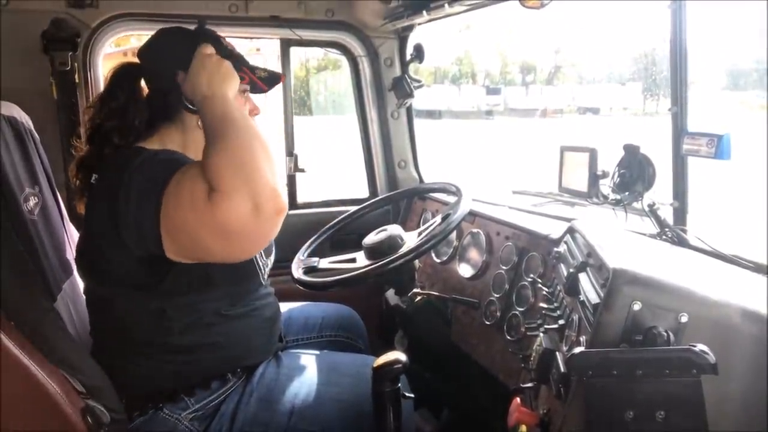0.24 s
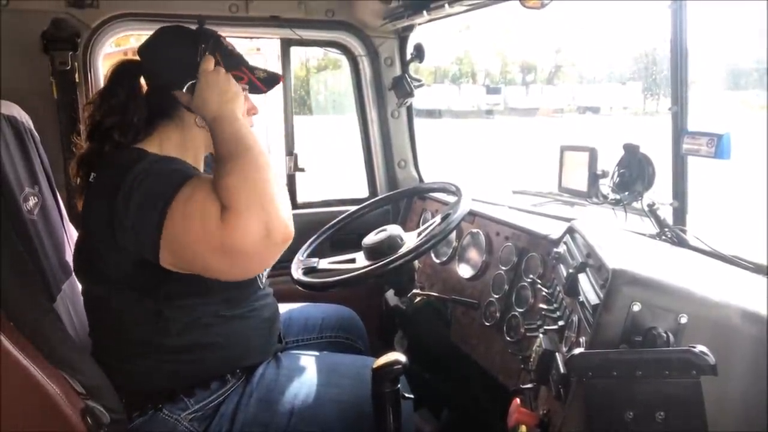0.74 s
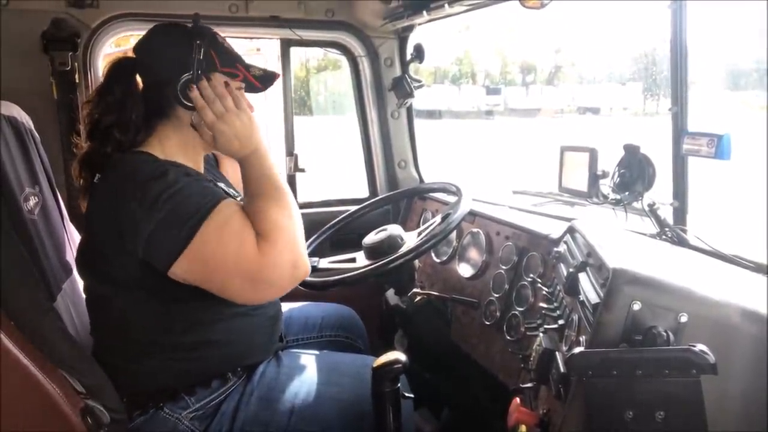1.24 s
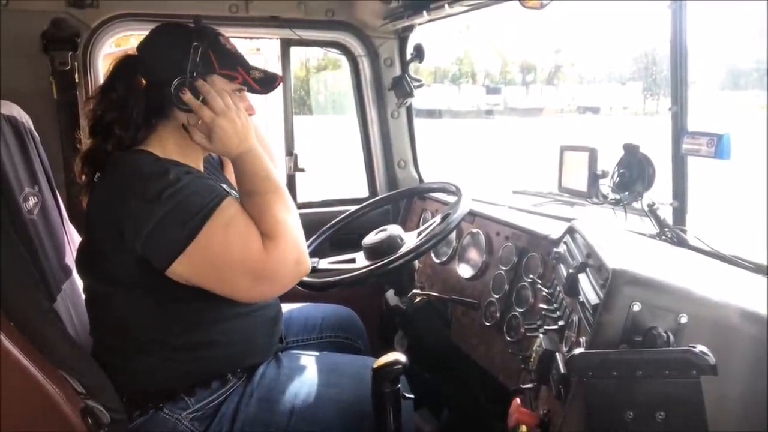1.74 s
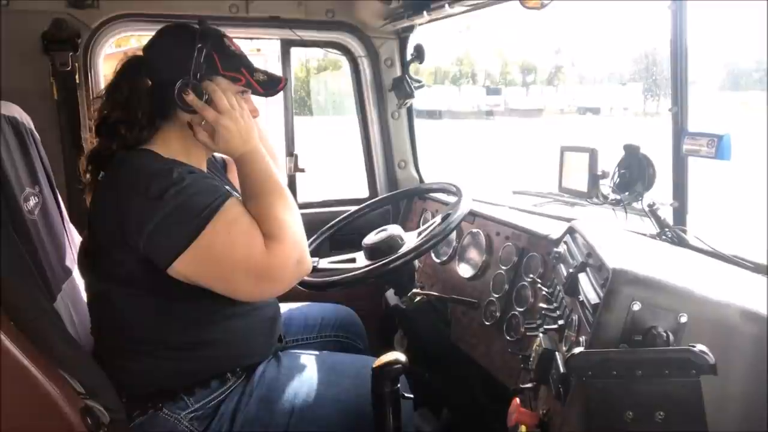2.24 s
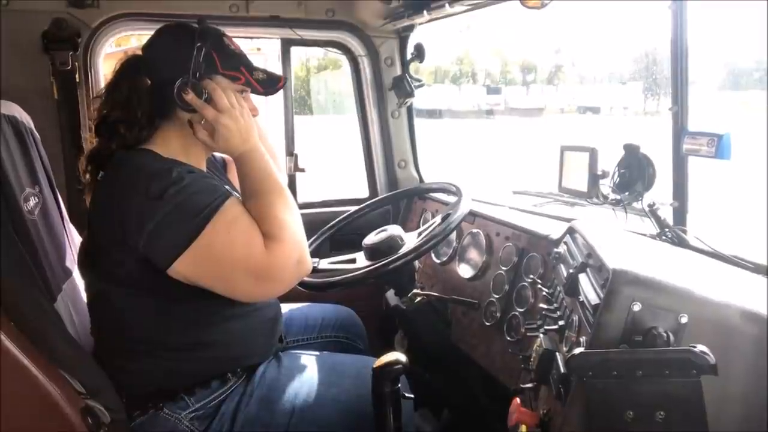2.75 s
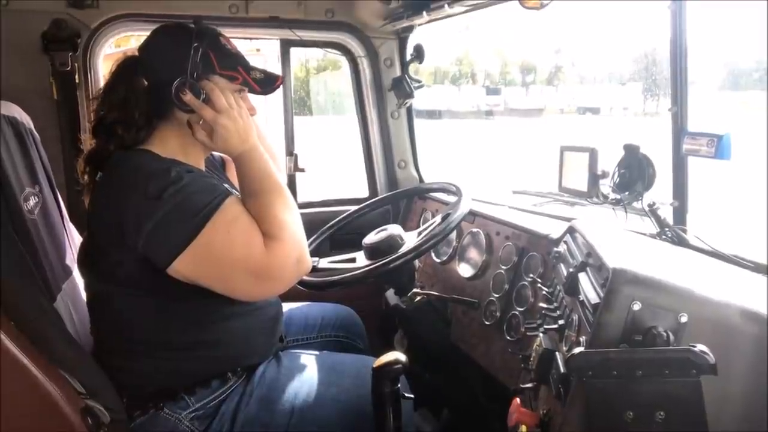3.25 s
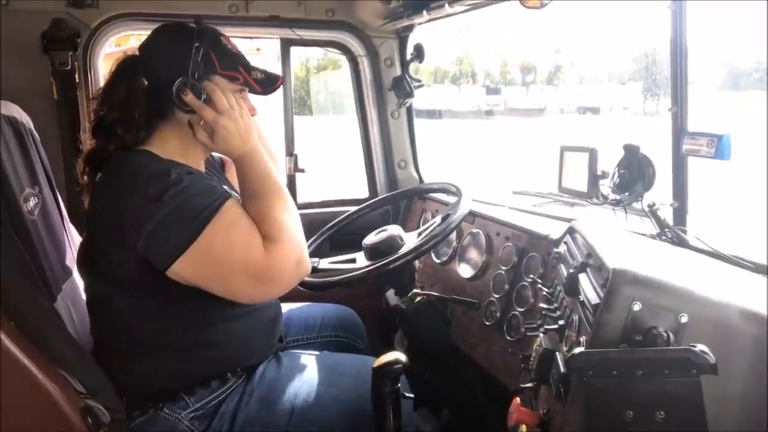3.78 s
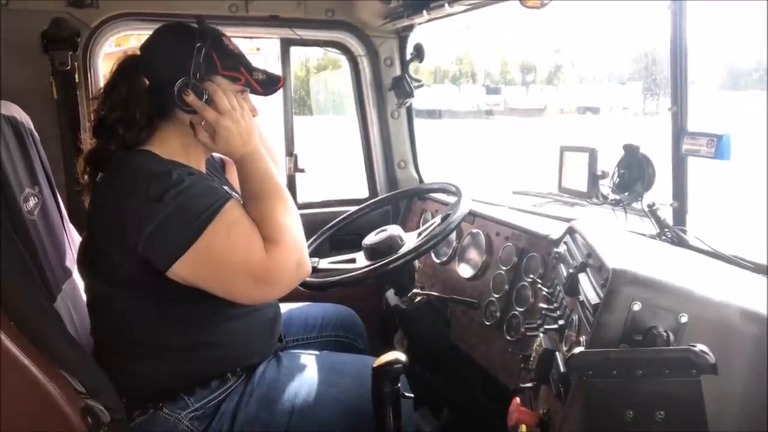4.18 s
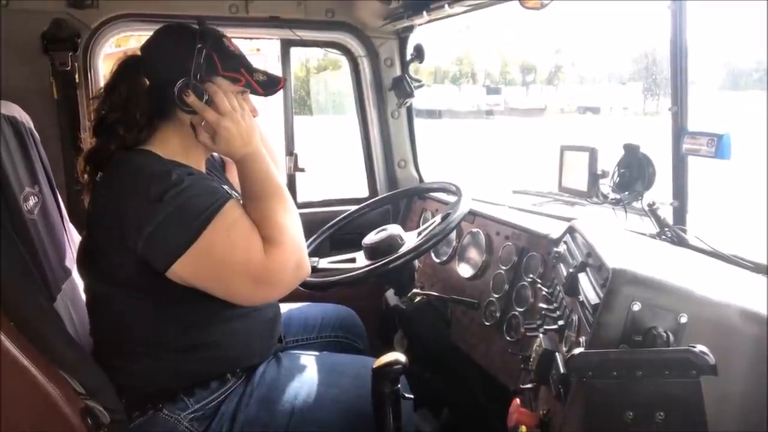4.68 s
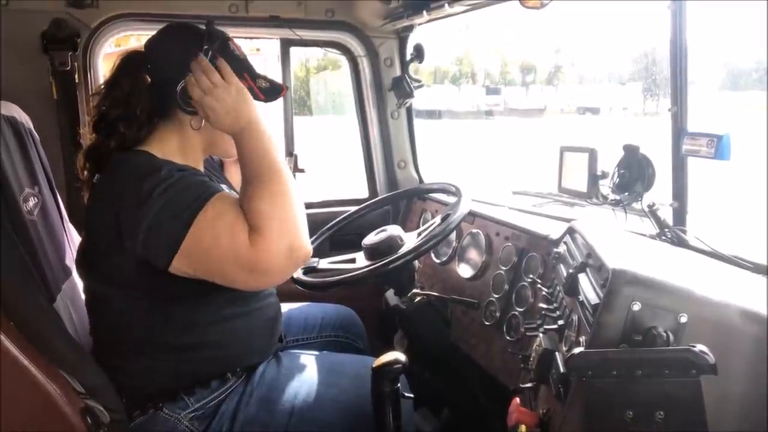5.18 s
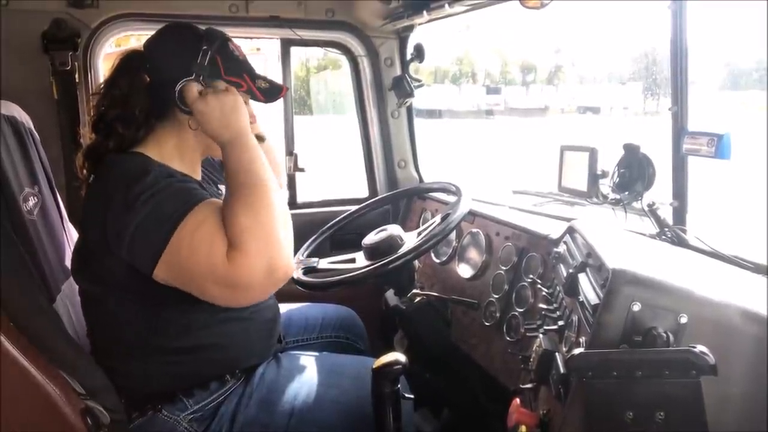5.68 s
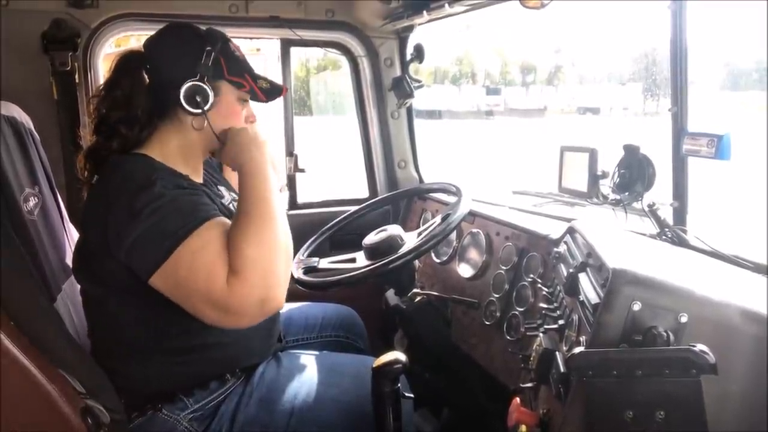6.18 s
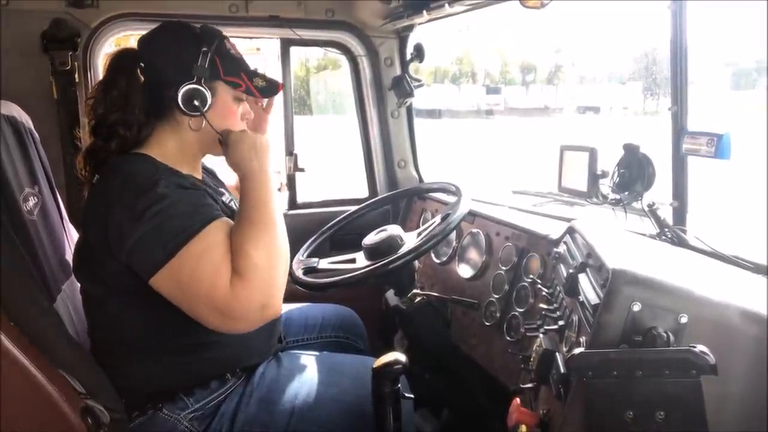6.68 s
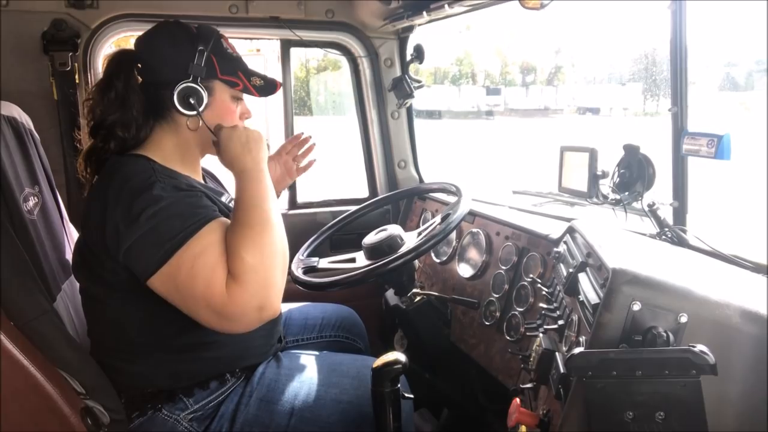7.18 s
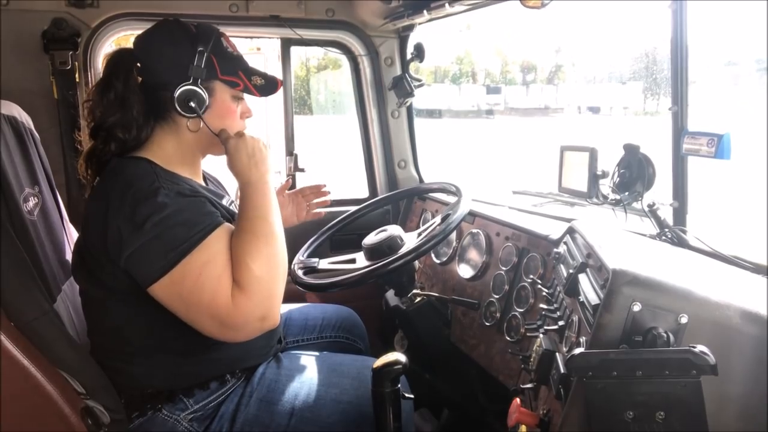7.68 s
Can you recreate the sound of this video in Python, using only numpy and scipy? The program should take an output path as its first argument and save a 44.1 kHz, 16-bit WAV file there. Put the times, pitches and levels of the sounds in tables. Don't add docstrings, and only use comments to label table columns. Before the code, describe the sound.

Continuous diesel idle heard from the seat by a small camera: low hum and rumble, panel drone, soft mechanical hiss pulsing rapidly with the firings. A faint high motor whine sags and recovers about every one and a half seconds, with tiny plastic ticks. Four dull thumps come early. Late on, the sound abruptly mutes, returns with a small pop a little louder, and one more low thump follows.

```python
import sys
import numpy as np
from scipy import signal
from scipy.fft import rfft, irfft, dct, next_fast_len
from scipy.io import wavfile
from scipy.ndimage import uniform_filter1d

SR = 44100
rng = np.random.default_rng(int(sys.argv[2]) if len(sys.argv) > 2 else 0)


def natural_amplitude(level_db):
    exponent = np.asarray(level_db, float) / 20
    return 10 ** exponent


def wav_out(sig):
    wavfile.write(sys.argv[1], SR, np.round(np.clip(np.atleast_2d(sig).T, -1, 1) * 32767).astype(np.int16))


N = 349713
TIME = np.arange(N) / SR
CUT_S, RESUME_S = 6.2952, 6.7781

ENGINE_ORDERS = [5, 6, 9, 12, 15, 17, 18, 23, 27, 30, 34, 85.9, 103.4, 109.2, 110.3, 189.3]
ENGINE_ORDER_LEVELS = [-67.5, -42, -49.5, -38.5, -42.5, -48, -43, -46.5, -47.5, -45, -49.5, -63, -57, -60.5,
                       -53.5, -53]
# pitch_hz, level_db (per Hz)
RUMBLE_SPECTRUM = [(12, -48), (20, -29), (43, -6.5), (80, 0), (150, -2), (177, -4), (282, -14.5), (315, -8),
                   (348, -11.5), (400, -14), (520, -25), (880, -120)]
# pitch_hz, level_db (per Hz)
DRONE_SPECTRUM = [(120, -41.5), (200, 3), (317, -2.5), (463, -9.5), (518, -6), (569, -11.5), (674, -9),
                  (1110, -7.5), (1730, -17), (1900, -12.5), (2470, -43), (4180, -120)]
# pitch_hz, level_db (per Hz)
HISS_SPECTRUM = [(880, -20.5), (1500, -13), (1720, -11.5), (1950, -11), (2090, -7), (2810, -11.5),
                 (3250, -15), (3550, -11.5), (4810, -19), (6210, -19), (9190, -30), (10400, -33.5),
                 (15600, -40)]
# pitch_hz, width_hz, lift_db
CAB_RESONANCES = [(85, 14, 1.5), (130, 21, 3), (199.7, 10, -2.5), (299, 17, 2), (352, 14.9, -2.5),
                  (376, 36, 2.5), (504, 14, 2.5), (542, 88, 5), (570, 14, 1.5), (650, 18, 2),
                  (980, 87, 1.5), (1120, 120, 1.5), (1299, 25, 4.5), (1350, 39, 6), (1510, 22, -1),
                  (1475, 26, 6.5), (1770, 25, 1.5), (1910, 28, 2.5), (1952, 56, 7.5), (2160, 48, 0),
                  (2743, 41, 4), (3053, 120, 5.5), (3365, 47, 3.5), (4900, 400, -1.5), (5320, 88, 5),
                  (10530, 420, -4.5)]
# pitch_hz, level_db, t60_s
CLATTER_MODES = [(1173, -3, 0.062), (1243, 9.5, 0.028), (2490, 0, 0.089), (2764, 0, 0.054),
                 (3050, -8.5, .09), (3455, -4, 0.12), (3790, -5.5, 0.077), (5180, -13.5, 0.055),
                 (6200, -8, .05), (7100, -21, .05)]
# ratio to the whine, level_db (rms)
FAN_GEARS = [(1.1542, -57), (1.1285, -63)]
# start_s, level_db (peak), pitch_hz, t60_s
FLOOR_KNOCKS = [
    (0.182, -27, 101, .12),
    (0.755, -18, 93, .1),
    (1.229, -13, 98, .14),
    (1.69, -14.5, 109, 0.093),
    (7.246, -13, 85, 0.15),
]
# start_s, level_db (peak)
FAN_TURNS = [
    (0.774, -29.5),
    (2.2717, -29),
    (3.7873, -29.5),
    (5.2968, -30),
    (6.775, -29),
]
# pitch_hz, level_db, t60_s
TICK_RING = [(7550, 2, 0.024), (3660, 0.5, 0.048), (4600, -2.5, 0.041), (5480, -9.5, .04),
             (8450, -9.5, 0.018), (11800, -21.5, .025), (13300, -12, .03), (15200, -19.5, .025)]
# start_s, spared_below_hz, share_lost (0-1)
THIN_MOMENTS = [(.851, 4500, 1), (1.574, 4600, 1), (3.047, 4800, 1), (4.626, 4000, .9), (4.905, 6500, .95),
                (5.245, 4100, 1), (5.287, 7500, 1), (5.779, 6800, .95), (5.992, 4000, 1), (6.12, 4200, .95),
                (6.866, 4200, 1), (7.058, 4800, .95), (7.123, 4100, .9), (7.208, 3600, 1),
                (7.55, 4500, .95), (7.613, 4700, .95), (7.671, 4300, 1), (7.676, 4300, 1)]


def evened(x):
    return x / np.sqrt(np.mean(x ** 2) + 1e-20)


def read(points, hz):
    pitch_hz, value = np.transpose(points)
    return np.interp(np.log(hz + 1), np.log(pitch_hz + 1), value)


def level_db(steady_db, lift_db):
    return steady_db + lift_db * (TIME > RESUME_S)


def drift(top_hz):
    rates_hz = np.geomspace(top_hz / 20, top_hz, num=16)
    return evened(sum(np.sin(2 * np.pi * (f * TIME + rng.random())) / np.sqrt(f) for f in rates_hz))


def ringing(hz, phase, t):
    return np.sin(2 * np.pi * (hz * t + phase))


def patchy(patch_db, size):
    frames, bins = N * 4 // size + 5, size // 2 + 1
    real, imag, patches = rng.standard_normal((frames, bins, 3)).T
    patches = uniform_filter1d(patches, size=9, axis=0)
    patches = evened(uniform_filter1d(patches, size=12, axis=1))
    spectrum = (real + 1j * imag) * natural_amplitude(patch_db * patches)
    noise = signal.istft(spectrum, nperseg=size, noverlap=size * 3 // 4)[1]
    return evened(noise[:N])


def through_cab(x, spectrum):
    size = next_fast_len(N)
    hz = np.fft.rfftfreq(size, 1 / SR)
    lift_db = sum(db / (1 + (2 * (hz - f) / width) ** 2) for f, width, db in CAB_RESONANCES)
    shaped = rfft(x, size) * natural_amplitude(read(spectrum, hz) + lift_db)
    return evened(irfft(shaped, size)[:N])


def engine():
    cycle_hz = 5.835
    cycles = np.cumsum(cycle_hz * (1 + .0012 * drift(2.5))) / SR
    firing = 6 * cycles
    orders = np.zeros(N)
    for order, db in zip(ENGINE_ORDERS, ENGINE_ORDER_LEVELS):
        wavering = natural_amplitude(db + 1.1 * drift(9.))
        orders += wavering * np.sqrt(2) * ringing(order, rng.random(), cycles)
    orders *= natural_amplitude(level_db(0, 1.8))

    strength = natural_amplitude(1.0 * rng.standard_normal(int(firing[-1]) + 1))[firing.astype(int)]
    knock = strength * np.exp(-(firing % 1) / 0.67)
    rumble_db, drone_db, hiss_db = level_db(-30, 1), level_db(-33.5, 1.17), level_db(-44, 3.5)
    rumble = through_cab(patchy(1.4, size=2048) * (1 + .11 * knock), RUMBLE_SPECTRUM)
    rumble *= natural_amplitude(rumble_db - 1.03 + 1.2 * drift(60.))
    drone = through_cab(patchy(1.7, size=1024) * (1 + .1 * knock), DRONE_SPECTRUM)
    drone *= natural_amplitude(drone_db - .3)
    hiss = through_cab(patchy(1.1, size=512) * (1 + .14 * knock), HISS_SPECTRUM)
    hiss *= natural_amplitude(hiss_db + 2.6)
    return orders + rumble + drone + hiss + natural_amplitude(hiss_db - 6.5) * clatter(firing)


def clatter(firing):
    chance = 260 / SR * np.exp(-(firing % 1) / .5)
    blow_db = 3.5 * np.minimum(rng.standard_normal(N), 1.3)
    blows = (rng.random(N) < chance) * natural_amplitude(blow_db)
    mode, t = rng.integers(0, len(CLATTER_MODES), N), TIME[:4000]
    out = np.zeros(N)
    for k, (hz, db, t60) in enumerate(CLATTER_MODES):
        ring = natural_amplitude(db - 60 * t / t60) * ringing(hz, 0, t)
        out += signal.oaconvolve(blows * (mode == k), ring)[:N]
    return evened(out)


def fan_load():
    sweep_s = 1.508
    turns_s = np.array([FAN_TURNS[0][0] - sweep_s] + [s for s, db in FAN_TURNS])
    since_s = TIME - turns_s[np.searchsorted(turns_s, TIME) - 1]
    coast_s, take_up_s, labour_s, release_s = 0.033, 0.0716, .74, 0.1716
    return np.interp(since_s, np.cumsum([coast_s, take_up_s, labour_s, release_s]), [0, 1, 1, 0])


def fan():
    free_hz, sag_hz, loaded_db = 1961.4, 16, -10.5
    load = fan_load()
    turns = np.cumsum(free_hz - sag_hz * load + .6 * drift(10.)) / SR
    whine_db = level_db(-45, 3.5) + loaded_db * load ** 2 + .7 * drift(30.)
    out = natural_amplitude(whine_db) * ringing(1, 0, turns)
    for ratio, db in FAN_GEARS:
        out += natural_amplitude(db + 2.5 * (load - .5) + 1.1 * drift(11.0)) * ringing(ratio, 0, turns)
    return np.sqrt(2) * out


def thumps():
    out, t = np.zeros(N), TIME[:9000]
    for s, db, hz, t60 in FLOOR_KNOCKS:
        swell = 1 - np.exp(-t / 0.0054)
        out[round(s * SR):][:len(t)] += natural_amplitude(db - 60 * t / t60) * swell * ringing(hz, 0, t)
    return out


def ticks():
    out, t = np.zeros(N), TIME[:4000]
    for s, db in FAN_TURNS:
        ring = np.zeros(len(t))
        for hz, mode_db, t60 in TICK_RING:
            struck_db = mode_db + 3.2 * rng.standard_normal()
            ring += natural_amplitude(struck_db - 60 * t / t60) * ringing(hz, rng.random(), t)
        rattle = rng.standard_normal(len(t)) * natural_amplitude(-5.0 - 60 * t / 0.088)
        click = (ring + rattle) * np.minimum(t / .0007, 1)
        rebound = natural_amplitude(-9.0) * np.roll(click, round(0.0074 * SR))
        out[round(s * SR):][:len(t)] += natural_amplitude(db - 10.0) * (click + rebound)
    return out


def scene():
    return (engine() + fan() + thumps() + ticks())[None]


def thin_out(x):
    x, block = x.copy(), 1882
    window = np.sin(np.pi * (np.arange(block) + .5) / block)
    hz = np.arange(block) * SR / 2 / block
    notch = (1 - np.sqrt(1 - window ** 2)) / window
    margin = 3.2 - 1.2 * np.exp(-((hz - 6000) / 700) ** 2)
    for s, spared_hz, share in THIN_MOMENTS:
        at = slice(round(s * SR) - block // 2, round(s * SR) + block // 2)
        lines = dct(x[at] * window, type=4, norm="ortho")
        local = np.sqrt(uniform_filter1d(lines ** 2, size=120))
        treble = hz > spared_hz
        lost = treble & ((abs(lines) < margin * local) | (hz > 9800))
        boosted = treble & ~lost
        removed = lines * (lost - 0.81 * boosted)
        x[at] -= share * notch * dct(removed, type=4, norm="ortho")
    return x


def cut_out(x):
    smear = signal.lfilter(*signal.butter(3, 1500, fs=SR), x) * natural_amplitude(-27.5)
    gate = np.clip(np.maximum(CUT_S - TIME, TIME - RESUME_S) / .00025, 0, 1)
    spill_after = 1.4 * np.clip((CUT_S + 0.022 - TIME) / .012, 0, 1)
    spill_before = 0.27 * np.clip((TIME - RESUME_S + 0.026) / .01, 0, 1)
    return x * gate + smear * (1 - gate) * (spill_after + spill_before)


def resume_pop():
    after = np.maximum(TIME - RESUME_S, 0)
    burst = np.minimum(after / .00003, 1) * np.exp(-after / .0003)
    return natural_amplitude(-12.5) * burst * np.cos(2 * np.pi * 1400 * after)


def roll_off(x):
    return signal.sosfilt(signal.butter(12, 16000, fs=SR, output="sos"), x)


def record(dry):
    band_limit = signal.firwin(2047, 15740, window=("kaiser", 9), fs=SR)
    x = thin_out(signal.oaconvolve(dry[0], band_limit, "same"))
    x = cut_out(x) + resume_pop()
    return roll_off(x[None])


dry = scene()
out = record(dry)
wav_out(out)
```